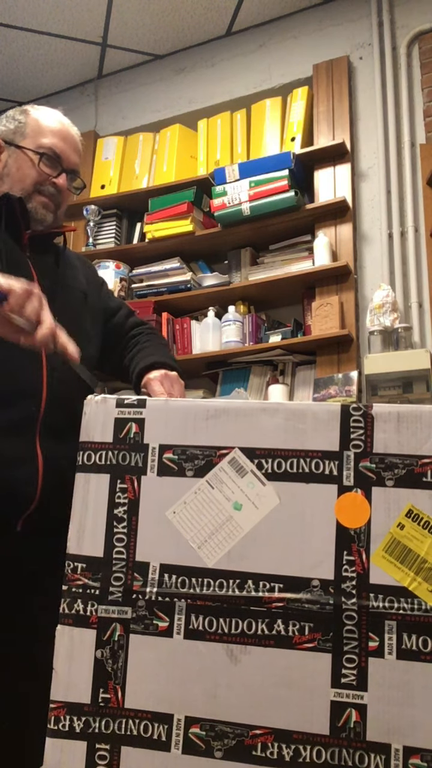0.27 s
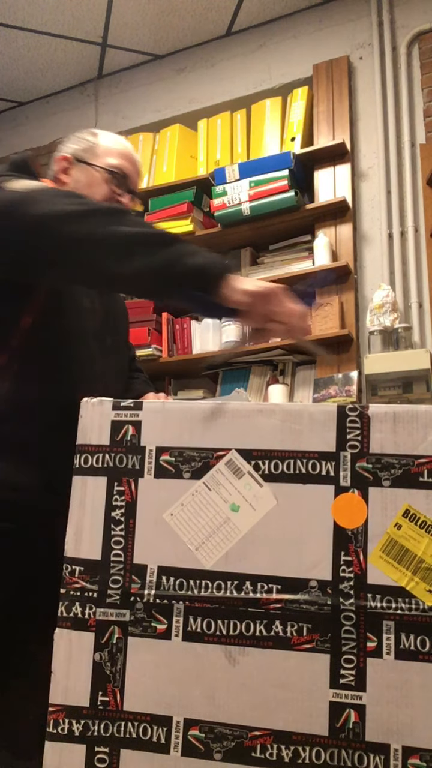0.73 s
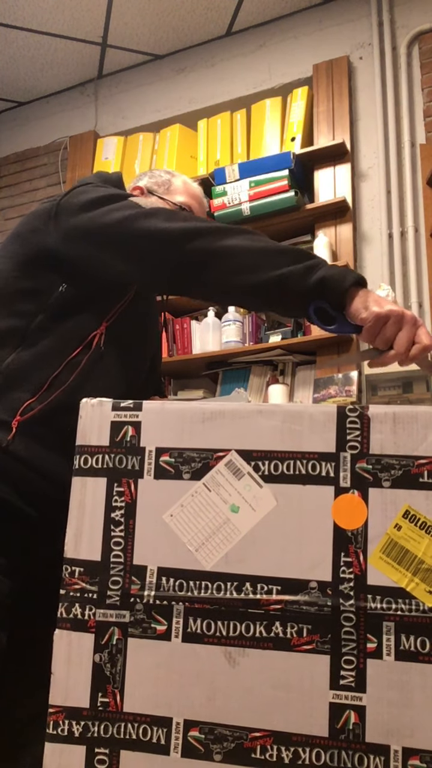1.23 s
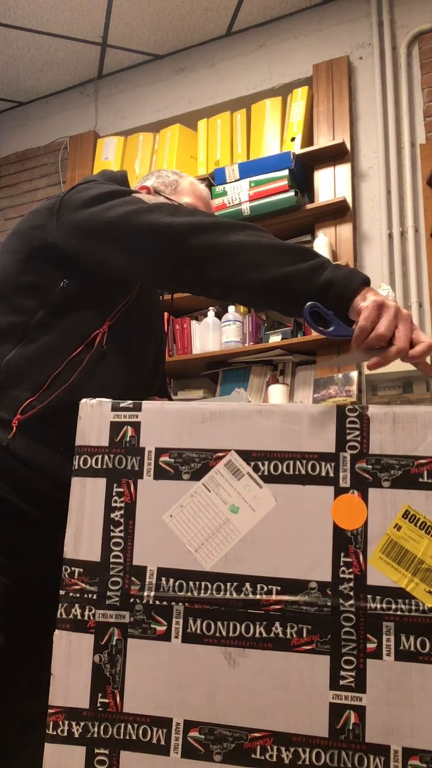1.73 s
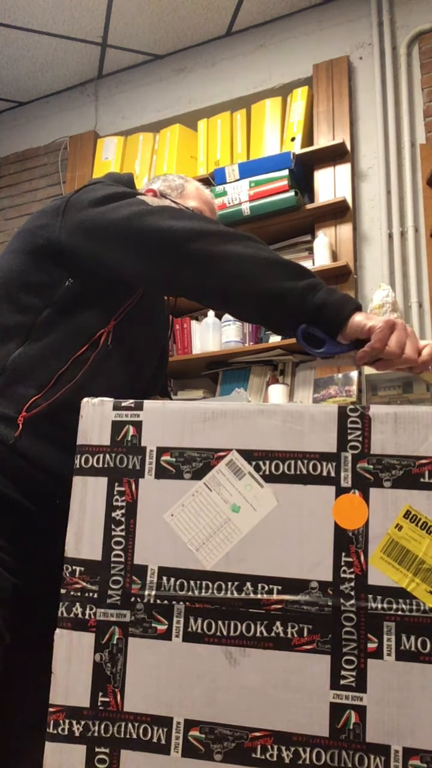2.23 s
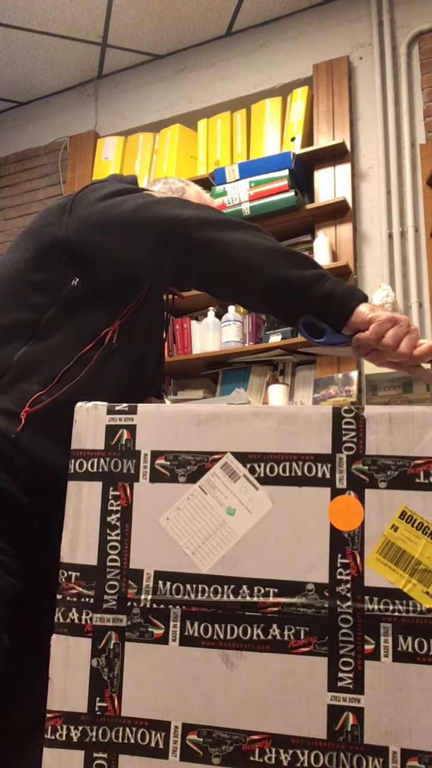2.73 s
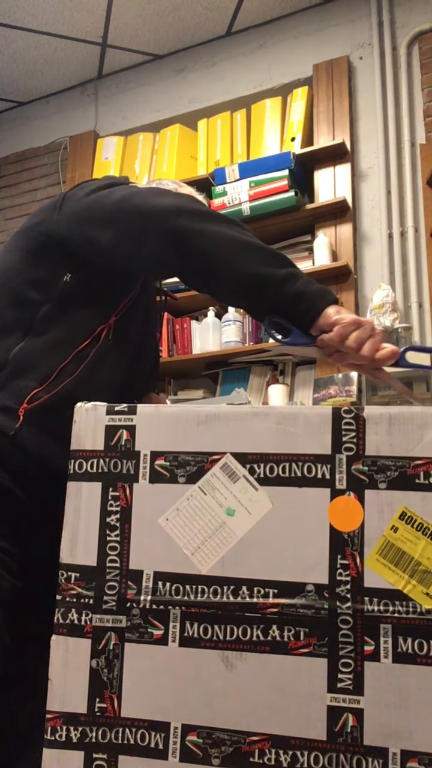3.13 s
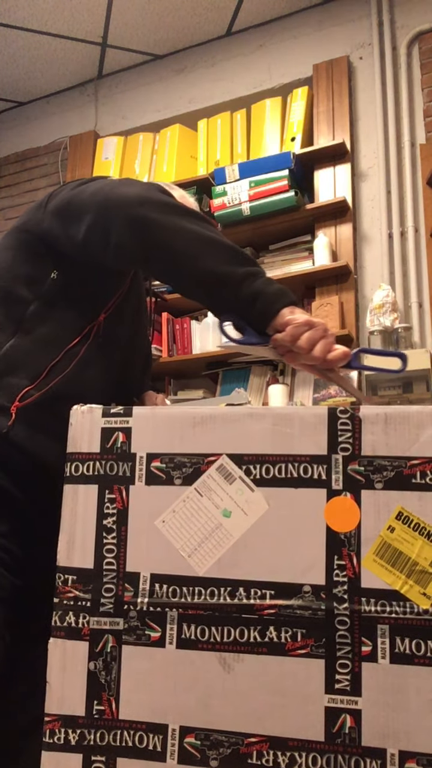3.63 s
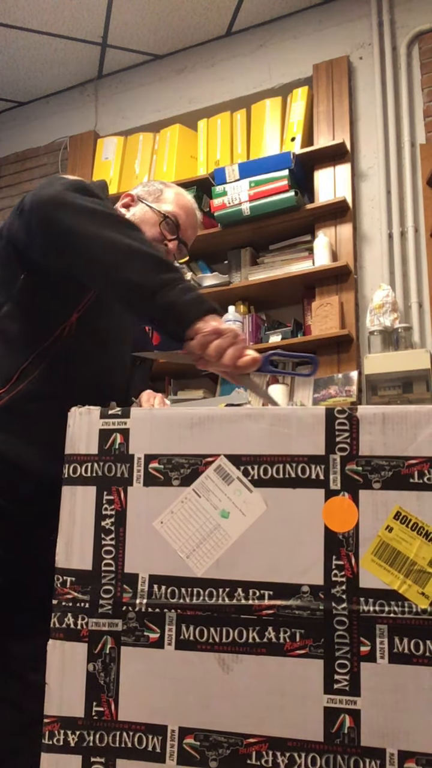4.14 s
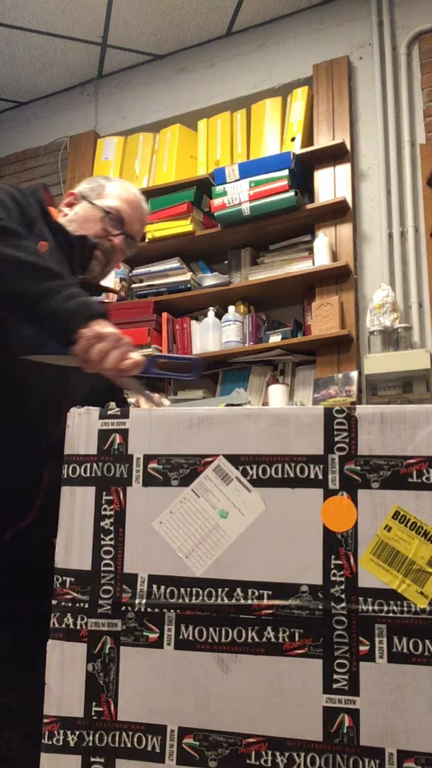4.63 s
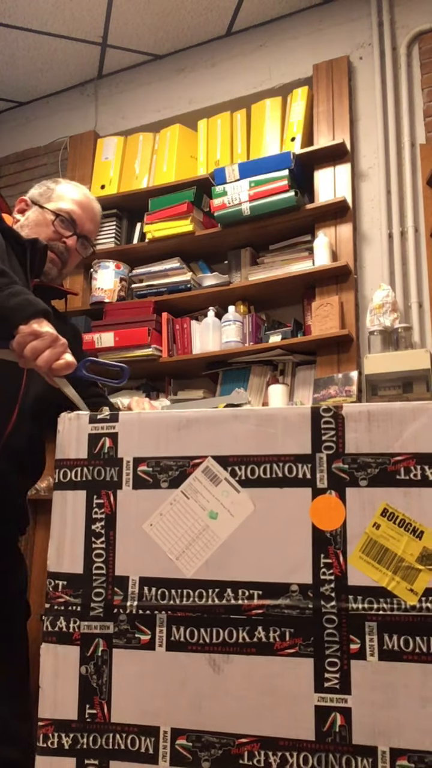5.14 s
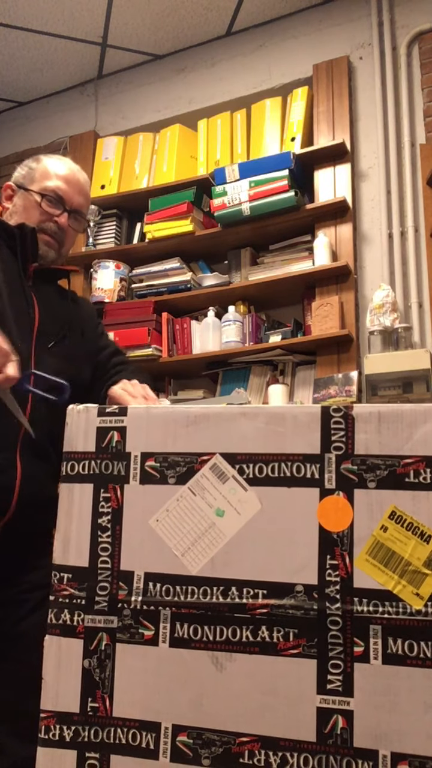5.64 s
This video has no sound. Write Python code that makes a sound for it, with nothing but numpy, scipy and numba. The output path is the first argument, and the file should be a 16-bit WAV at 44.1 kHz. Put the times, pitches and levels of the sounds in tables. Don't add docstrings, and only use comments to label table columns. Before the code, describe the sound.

Close phone microphone in a small, quiet, faintly humming workshop. Palms and a sleeve rub a large hollow cardboard box with low thuds; loose scissors tick lightly. After a quiet gap the blade pokes, punches in, and drags loudly through taut tape in harsh jerks, then rasps along the cardboard seam with a humming flap. Finally hands rub and bump the rim.

```python
import sys
import numpy as np
from scipy import signal
from scipy.fft import rfft, irfft, next_fast_len
from scipy.io import wavfile
from scipy.ndimage import uniform_filter1d
from numba import njit

SR = 44100
rng = np.random.default_rng(int(sys.argv[2]) if len(sys.argv) > 2 else 0)


def volts(x):
    e = np.asarray(x, float) / 20
    return 10 ** e


def inscribe(sig):
    pcm = np.round(np.clip(np.atleast_2d(sig).T, -1, 1) * 32767)
    wavfile.write(sys.argv[1], SR, pcm.astype(np.int16))


N = 259676
TIME = np.arange(N) / SR

# f/Hz, density/dB per Hz
CARD = [(590, 12), (1000, -25), (1100, -4.5), (1340, 0), (1650, -5), (2130, -3), (2560, -7), (4570, -3.5),
        (6400, -3), (7790, -5.5), (9720, 0.5), (10700, -6), (12000, -6.5), (15100, -10.5), (16000, -31)]


def level(x, db=0):
    return x * volts(db) / np.sqrt(np.mean(x ** 2))


def colour(x, points, low_hz=0., high_hz=SR):
    size = next_fast_len(len(x))
    hz = np.fft.rfftfreq(size, 1 / SR) + 1
    spots, db = np.transpose(points)
    edges = 1 / np.sqrt((1 + (low_hz / hz) ** 8) * (1 + (hz / high_hz) ** 8))
    gain = volts(np.interp(np.log(hz), np.log(spots), db))
    return irfft(rfft(x, size) * gain * edges, size)[:len(x)]


def ring(x, hz, t60):
    pole = np.exp(2j * np.pi * hz / SR - np.log(1000) / (t60 * SR))
    return signal.lfilter([0, pole.imag], [1, -2 * pole.real, abs(pole) ** 2], x)


def body(x, modes):
    out = 0
    for k, (hz, db, t60) in enumerate(modes):
        out = out + (-1) ** k * volts(db) * ring(x, hz, t60) / np.sqrt(t60)
    return out


@njit
def sweep(x, hz, width):
    y, band, low = np.empty(len(x)), 0., 0.
    for i in range(len(x)):
        g, k = np.tan(np.pi * hz[i] / SR), width / hz[i]
        v = (band + g * (x[i] - low)) / (1 + g * (g + k))
        band, low, y[i] = 2 * v - band, low + 2 * g * v, k * v
    return y


def steady(x, window_s, hold):
    swing = np.sqrt(uniform_filter1d(level(x) ** 2, int(window_s * SR)) + 0.017)
    return level(x / swing ** hold)


def wander(rate, spread_db):
    k = int(SR / rate)
    steps = np.repeat(rng.standard_normal(N // k + 1), k)
    return volts(spread_db * uniform_filter1d(steps, k)[:N])


def add(out, s, sound):
    at = int(s * SR)
    out[at:at + len(sound)] += sound[:N - at]


def workshop():
    # f/Hz, density/dB per Hz
    floor_colour = [(15, -53), (25, -20), (41, -14.5), (64, 1.5), (82, -11.5), (153, -13.5), (170, -12.5),
                    (503, -23.5), (863, -27), (2110, -33), (10100, -38.5), (11600, -34.5), (16000, -43)]
    return level(colour(rng.standard_normal(N), floor_colour), -70)


def contact(start, end, first_db, last_db, rise_s, fall_s):
    db = np.interp(TIME, [start, end + 1e-6], [first_db, last_db])
    outside = np.maximum((start - TIME) / rise_s, (TIME - end) / fall_s)
    return volts(db - 20 * np.maximum(outside, 0))


def efforts():
    # start/s, end/s, effort at start/dB, effort at end/dB, weight on the box/dB
    palm_slides = [(0, .06, -56.5, -63, 11.5), (0.053, 0.146, -65.5, -66.5, 9.5),
                   (0.155, .19, -80, -73, -2.5), (0.209, 0.347, -55.5, -61.5, 7.5),
                   (0.36, 0.39, -66, -74, 13.5), (0.395, 0.62, -66, -73.5, 0),
                   (0.615, 1.08, -79.5, -81, 8.5), (1.815, 1.84, -90, -90, 21),
                   (1.855, 1.953, -65.5, -80.5, 8), (5.028, 5.19, -64.5, -75.5, 12),
                   (5.197, 5.281, -62, -55, 8.5), (5.468, 5.632, -66, -66, 7.5),
                   (5.639, 5.666, -58, -60.5, 12.5), (5.677, 5.797, -69, -75.5, 11.5),
                   (5.8, 5.89, -85, -79, 10)]
    sleeve_slides = [
        (1.084, 1.129, -58, -60, 2),
        (1.143, 1.25, -76, -67, 0),
        (1.3, 1.434, -82, -77.5, 5.5),
        (1.574, 1.7, -71.5, -90, 0),
        (2.232, 2.3, -78, -85, -6),
    ]
    nail_slides = [
        (1.287, 1.372, -71, -77.5, -8),
        (5.298, 5.357, -63, -66.5, 12),
        (5.364, 5.442, -73, -75.5, 13),
        (5.451, 5.48, -63.5, -66, 9.5),
    ]
    pulls = [(2.39, 2.555, -75.5, -71, 8), (2.554, 2.706, -66.5, -70, 6.5),
             (2.709, 2.812, -63.5, -65.5, 4.5), (2.812, 2.927, -52, -54.5, -1),
             (2.921, 3.005, -41, -45.5, 0.5), (3.009, 3.163, -42, -45.5, 1),
             (3.164, 3.241, -42.5, -47, 1.5), (3.247, 3.305, -55.5, -55.5, 3.5),
             (3.309, 3.396, -42.5, -43.5, -1.5), (3.406, 3.518, -41.5, -46.5, 2.5),
             (3.529, 3.588, -42, -46.5, 0), (3.597, 3.667, -43, -45, 0), (3.676, 3.777, -42, -43.5, -1.5),
             (3.783, 4.024, -41, -38.5, -0.5), (4.041, 4.135, -50, -52.5, 0),
             (4.138, 4.172, -56, -62.5, 15.5), (4.167, 4.356, -50.5, -49.5, 6.5),
             (4.353, 4.697, -49, -47.5, 8.5), (4.702, 5.036, -47, -50, 7)]
    shares = {"palm": ((0.38, -10.5, -7), 0.033, 0.021), "sleeve": ((-7, -8.5, -6.5), 0.0083, .04),
              "nail": ((7, -10, -4), 0.015, 0.046), "poke": ((-9.5, -9.5, -11), 0.0055, .01),
              "tape": ((-8, -4.5, -60), 0.0052, 0.014), "card": ((-2.1, -15, -60), .006, 0.018)}
    # t/s, note/Hz, level re blade effort/dB
    tension = [(2.87, 330, -9.5), (3.18, 334, -5.5), (3.354, 354, -7.5), (3.512, 346, -5),
               (3.62, 351, -6.5), (3.85, 362.5, -1), (4.028, 339, 3), (4.04, 338, 3), (4.09, 344.5, 4),
               (4.3, 340, -1.5), (4.54, 357.6, 1), (4.7, 308.5, -5), (5.05, 300, -5)]
    s, pulled_hz, grip_db = np.transpose(tension)
    rows = [("palm", row) for row in palm_slides]
    rows += [("sleeve", row) for row in sleeve_slides]
    rows += [("nail", row) for row in nail_slides]
    for row in pulls:
        kind = "poke" if row[1] < s[0] else "tape" if row[1] < 4.1 else "card"
        rows.append((kind, row))
    power = np.full((5, N), 1e-14)
    for kind, (start, end, first_db, last_db, weight) in rows:
        (dull, small, loose), rise_s, fall_s = shares[kind]
        gain = contact(start, end, first_db, last_db, rise_s, fall_s)
        parts_db = np.array([0, dull, weight, weight + small, weight + loose])
        power += np.outer(volts(parts_db) ** 2, gain ** 2)
        if kind in ("tape", "card"):
            power[4] += (gain * volts(np.interp(TIME, s, grip_db))) ** 2
    flap_db = 10 * np.log10(power[4])
    slack_hz = 300 + 0.28 * np.maximum(flap_db + 72.5, 0)
    pulled = (TIME > s[0]) & (TIME < s[-1])
    flap_hz = np.where(pulled, np.interp(TIME, s, pulled_hz), slack_hz)
    return np.sqrt(power[:4]), flap_hz, flap_db


def lurch(rate, spread_db, fade_s, calm):
    kicks = (rng.random(N) < rate / SR) * volts(spread_db * rng.exponential(size=N))
    fading = signal.lfilter([1], [1, -np.exp(-1 / (fade_s * SR))], kicks ** 2)
    return level(np.sqrt(fading + calm))


def ruptures(rate, spread_db, smooth_db):
    size = volts(spread_db * np.minimum(rng.exponential(size=N), 2))
    snaps = (rng.random(N) < rate / SR) * np.clip(rng.standard_normal(N), -2, 2) * size
    return level(snaps) + level(rng.standard_normal(N), smooth_db)


def surface(grit, points, modes):
    skin = level(sum(wander(rate=7., spread_db=5.0) * body(grit, [mode]) for mode in modes), -7)
    dull = wander(rate=25., spread_db=0.5) * level(colour(grit, points, 1250.0, 4310.0)) + skin
    return np.array([level(colour(grit, points, 4830.0)), dull])


def drag(hiss, scrape, boom, rattle):
    # f/Hz, density/dB per Hz
    hand_colour = [(590, -52), (1000, -8), (1340, -9.5), (1450, -2.5), (1570, -12), (2530, -11.5),
                   (2980, -11.5), (4840, -7), (5250, -7.5), (6250, -7.5), (9490, 0.5), (14600, -9),
                   (16000, -17)]
    tape_colour = [(590, 9), (1000, 5), (1150, -6.5), (1670, -18.5), (1830, -13.5), (2180, -14),
                   (2530, -10), (3010, -17), (4410, -16), (4900, -13), (7020, -10), (9490, -17),
                   (10500, -23.5), (13900, -27), (16000, -31)]
    # f/Hz, level/dB, t60/s
    hand_skin = [(1995, -1.7, 0.011), (3210, 0.88, 0.0044), (3760, -0.61, 0.011)]
    tape_skin = [(2010, 6.5, 0.0099), (2620, 2.5, 0.015), (3700, -7, 0.012), (4540, 8.5, 0.0074)]
    card_skin = [(1320, 0, 0.014), (1500, 10.5, 0.045), (1950, 1.5, 0.0054), (2150, 14.5, .03),
                 (3014, 6.5, 0.044)]
    # f/Hz, level/dB, t60/s
    closed_panels = [(54.2, 2, 0.84), (88, -0.5, 0.12), (107, 4.5, 0.23), (126.7, 2, 0.11), (143, 5, 0.18),
                     (190, 5, 0.053), (227, -3, 0.061)]
    freed_panels = [(61, -6, 0.25), (85.6, -7.5, 0.081), (105.5, 0.5, 0.29), (127, 2.5, 0.2),
                    (143, 1, 0.17), (178, -5, 0.12), (220, -8.5, 0.046)]
    small_flaps = [(455, 3, 0.14), (531.2, 0.5, 0.1), (595, 6, 0.11), (708, 5, 0.033), (836, -0.5, 0.032),
                   (907, 2.5, 0.041), (1055, 0, 0.02)]
    tape_start_s, tape_end_s, seam_end_s = 2.78, 4.032, 5.08

    jerk = lurch(rate=55.0, spread_db=2.5, fade_s=0.008, calm=2.6)
    grit = ruptures(rate=3000., spread_db=-2.5, smooth_db=5.0)
    crackle = grit * lurch(rate=80., spread_db=3.5, fade_s=0.002, calm=.8)
    on_hand = surface(grit * jerk, hand_colour, hand_skin)
    on_tape = surface(grit * jerk, tape_colour, tape_skin)
    on_card = surface(crackle, CARD, card_skin)
    bright, dull = np.select([TIME < tape_start_s, TIME < tape_end_s], [on_hand, on_tape], on_card)
    on_rim = (TIME > 5.3) & (TIME < 5.64)
    dull = dull + on_rim * level(ring(crackle, 1530, t60=.03), -5)

    force = rng.standard_normal(N) * jerk ** 0.94
    closed = (TIME < tape_end_s) | (TIME > seam_end_s)
    panels = np.where(closed, level(body(force, closed_panels)), level(body(force, freed_panels)))
    panels = steady(panels, window_s=0.057, hold=0.25)
    small = steady(body(force, small_flaps), window_s=0.17, hold=0.78)
    return volts(-2.0) * (hiss * bright + scrape * dull) + volts(-2.0) * (boom * panels + rattle * small)


def flap(hz, db):
    force = rng.standard_normal(N)
    note = steady(sweep(sweep(force, hz, 30.), hz, 30.), window_s=.04, hold=.6)
    skirt = level(sweep(sweep(force, hz, 247.0), hz, 247.0))
    lock = np.clip((db + 60) / 24, .1, .8)
    gain = volts(0.5) * uniform_filter1d(volts(db), size=200)
    return gain * (np.sqrt(lock) * note + np.sqrt(1 - lock) * skirt)


def knocks():
    # t/s, peak level/dB, panel f/Hz, t60/s
    blows = [(0.002, -40, 122.3, 0.15), (.205, -41.5, 124, 0.15), (0.93, -58.5, 278, 0.094),
             (1.09, -50.5, 384, 0.26), (1.290, -57.5, 1950, .08), (1.571, -60.5, 488, 0.19),
             (1.808, -60, 196, .15), (1.843, -51.5, 247, 0.15), (1.857, -47.5, 250, 0.22),
             (2.547, -58.5, 300, 0.094), (2.549, -42.5, 127, 0.037), (2.699, -50, 143, 0.059),
             (2.702, -48, 280, 0.068), (2.921, -32, 718, 0.1), (2.922, -29, 135, 0.2),
             (3.312, -54, 124.1, 0.043), (5.013, -48, 144, 0.063), (5.235, -42.5, 105, 0.23),
             (5.478, -46, 130, 0.094), (5.642, -37, 97.6, 0.23), (5.662, -39.5, 105, 0.18)]
    out, t = np.zeros(N), TIME[:SR // 4]
    for s, db, hz, t60 in blows:
        push = np.hanning(int(.4 * SR / hz) + 3)
        panel = np.sin(2 * np.pi * hz * t) * 1000 ** (-t / t60)
        add(out, s, volts(db + 1.0) * np.convolve(push / push.sum(), panel))
    return out


def snags():
    # t/s, peak level/dB, centre f/Hz
    card_snags = [(0.1984, -61, 3140), (0.346, -41, 1650), (1.081, -55, 3640), (1.091, -37.5, 10400),
                  (1.1074, -37.5, 12000), (1.235, -56, 9900), (1.287, -66, 1770), (1.3014, -58, 1950),
                  (1.8073, -59, 2210), (4.0543, -40, 4490), (5.022, -30.5, 5700), (5.2061, -36.5, 5660),
                  (5.246, -37, 4220), (5.3048, -48, 1500), (5.4558, -35, 3700), (5.6351, -35, 1600)]
    # t/s, peak level/dB
    tape_snags = [(2.389, -60), (2.506, -55), (2.5638, -51), (2.596, -65), (2.6324, -52), (2.7028, -54),
                  (2.7414, -51.5), (2.793, -45), (2.8152, -37), (2.9208, -24.5), (3.0063, -29.5),
                  (3.1633, -30), (3.3083, -44), (3.3545, -27.5), (3.4056, -32), (3.4503, -30),
                  (3.53, -33.5), (3.5977, -34.5)]
    # t/s, peak level/dB
    flutes = [
        (4.0746, -32.5),
        (4.1103, -34),
        (4.1652, -37.5),
        (4.2615, -31),
        (4.38, -32),
        (4.4335, -41),
        (4.51, -36),
        (4.6077, -26.5),
        (4.7665, -27.5),
        (4.9965, -34.5),
    ]
    events = [(s, db, hz, 0.043) for s, db, hz in card_snags]
    events += [(s, db, 6850, 0.082) for s, db in tape_snags]
    events += [(s, db + 5.5, 2130, 0.017) for s, db in flutes]
    out, t = np.zeros(N), TIME[:SR // 4]
    for s, db, hz, t60 in events:
        noise = rng.standard_normal(len(t))
        crackle = level(colour(noise, CARD, 1200.)) + level(ring(noise, hz, .002), -8)
        attack = np.minimum(t / 0.0003, 1)
        decay = 1000 ** (-t / t60) + volts(-9.0) * np.exp(-t / 0.00066)
        add(out, s, volts(db - 14.5) * crackle * attack * decay)
    return out


def ticks():
    # f1/Hz, f2/Hz, f3/Hz, t60/s
    tip_modes = (7150, 11600, 14600, .014)
    handle_modes = (3800, 4360, 2620, .02)
    pivot_modes = (8800, 14000, 2900, .013)
    edge_modes = (9600, 4200, 7500, .011)
    # t/s, peak level/dB
    tips = [
        (0.396, -46.5),
        (0.4602, -49),
        (0.593, -48),
        (0.5963, -48),
        (1.742, -73),
        (1.754, -74),
    ]
    handle = [
        (1.571, -47),
        (1.842, -54.5),
    ]
    pivot = [
        (1.582, -56),
        (1.896, -49.5),
        (1.908, -45),
    ]
    edge = [
        (1.854, -41.5),
        (1.8567, -37),
        (1.8704, -37),
    ]
    parts = [(tip_modes, tips), (handle_modes, handle), (pivot_modes, pivot), (edge_modes, edge)]
    out, t = np.zeros(N), TIME[:SR // 4]
    for (*modes, t60), touches in parts:
        steel = sum(volts(-5.0 * k) * np.sin(2 * np.pi * hz * t) for k, hz in enumerate(modes))
        steel = steel * 1000 ** (-t / t60)
        for s, db in touches:
            touch = colour(rng.standard_normal(len(t)), CARD, 2400.0)
            touch = touch * (np.exp(-t / 0.0013) + volts(-8.5) * np.exp(-t / 0.012))
            tick = steel / np.abs(steel).max() + volts(-1.5) * touch / np.abs(touch).max()
            add(out, s, volts(db + 2.0) * tick)
    return out


def room(near):
    t = TIME[:SR // 2]
    tail = rng.standard_normal(len(t)) * 1000 ** (-t / 0.22) * (t > .004)
    return volts(-10.5) * signal.fftconvolve(near, tail / np.linalg.norm(tail))[:N]


def scene():
    gains, flap_hz, flap_db = efforts()
    near = drag(*gains) + flap(flap_hz, flap_db) + knocks() + snags() + ticks()
    return (near + room(near) + workshop())[None]


def top_cut(x):
    return signal.sosfilt(signal.butter(12, 16450, fs=SR, output="sos"), x)


def record(dry):
    # f/Hz, width/Hz, depth/0-1
    port_dips = [(4935, 270, 0.63), (10280, 580, 0.55)]
    heard = signal.sosfilt(signal.butter(2, 38., "high", fs=SR, output="sos"), dry[0])
    heard = signal.sosfilt(signal.ellip(8, .2, 60, 15800, fs=SR, output="sos"), heard)
    for hz, width, depth in port_dips:
        heard = heard - min(depth, .9) * sweep(heard, np.full(N, 1. * hz), 1. * width)
    return top_cut(heard[None])


dry = scene()
out = record(dry)
inscribe(out)
```